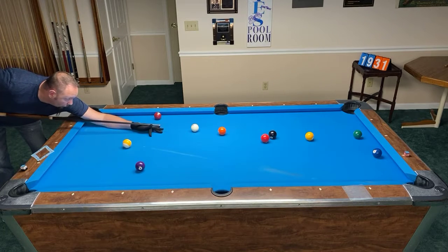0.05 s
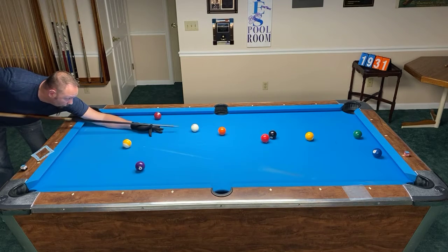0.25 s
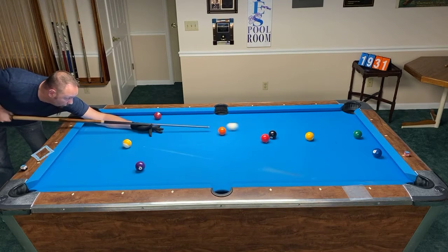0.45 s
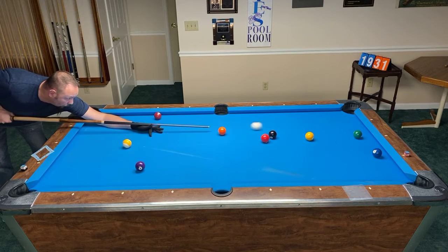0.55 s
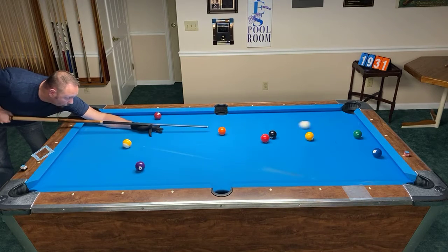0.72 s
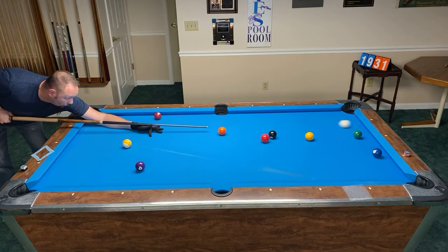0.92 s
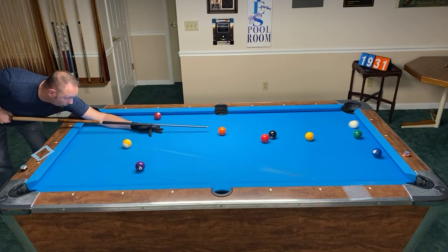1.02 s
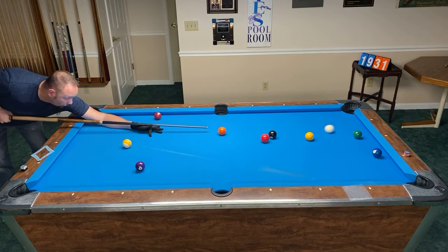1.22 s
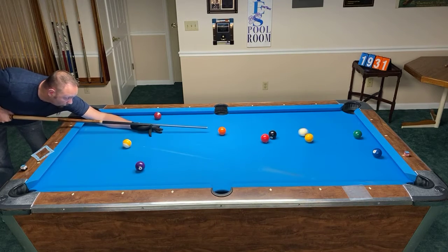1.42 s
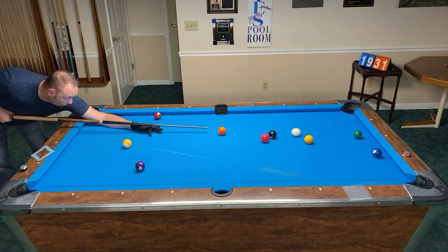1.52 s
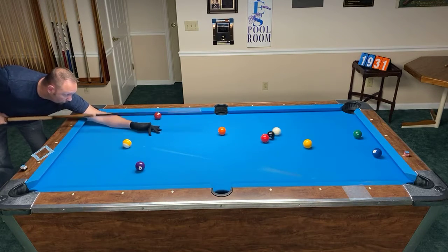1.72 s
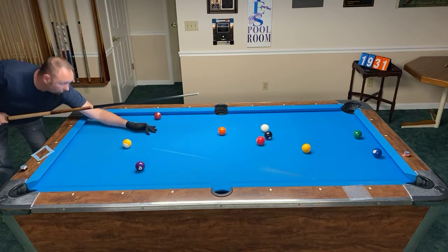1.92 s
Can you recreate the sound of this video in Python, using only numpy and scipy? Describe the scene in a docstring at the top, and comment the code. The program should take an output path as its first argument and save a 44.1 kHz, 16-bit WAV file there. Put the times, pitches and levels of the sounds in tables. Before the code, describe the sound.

Heard from a little distance in a quiet indoor games room, a cue strikes a ball sharply, dull rolling follows, a deep cushion thump, one bright ball click, then a close double click with short reverberation.

```python
"""In a low-ceilinged games room, a pool shot. The cue knocks the white, which hops onto the slate,
rumbles across the cloth, thuds off a cushion, clicks against one ball and then into a close pair.
Blows are short shaped pulses, heard directly, by ceiling and wall echoes and in a decaying noise tail.
Cue and table ring as decaying sines; rolling is a wandering low tone with coloured noise.
Faint clicks and still air lie behind, and a soft hiss swells at the end."""
import sys
import numpy as np
from scipy import signal
from scipy.fft import rfft, irfft
from scipy.io import wavfile

SR = 44100
rng = np.random.default_rng(int(sys.argv[2]) if len(sys.argv) > 2 else 0)


def digitize_waveform(pressure):
    """Quantize a signal to 16-bit integers and store it at the path in sys.argv[1].

    Rows of a 2-D input are taken as channels; values are limited to [-1, 1].
    """
    field = np.atleast_2d(pressure).T
    bounded = np.clip(field, -1, 1)
    quanta = np.round(bounded * 32767).astype(np.int16)
    wavfile.write(sys.argv[1], SR, quanta)


N = 85995  # length in samples
T = np.arange(N) / SR
HZ = np.maximum(np.arange(N + 1) * SR / (2 * N), 1)  # spectrum bins, kept above zero for the log axis

# Colour of the short hard contact of two balls.
# Each row: frequency in Hz before the click's brightness ratio, relative level in dB.
CLICK_COLOUR = [(60, -41), (250, -18), (550, -17), (1000, -5), (1600, -1.5), (2250, 1), (2750, -5.5),
                (3300, -13), (3850, -38), (4300, -28), (5100, -32.5), (5900, -47), (7200, -36.5),
                (10000, -50), (12500, -39.5), (13900, -40.5), (15000, -46), (16000, -51)]
# Ringing of the table's slate and frame. Each row: frequency in Hz, relative level in dB, t60 in seconds.
SLATE_MODES = [(131, -39.5, 0.48), (230, -51, 0.91), (314.5, -36, 0.28), (506.2, -25, 0.33),
               (538, -31.5, 0.24), (566, -32.5, 0.18), (611, -43.5, 0.52), (765, -40, 0.43),
               (845, -41.5, 0.5), (912, -45, 0.34)]


def from_db(db):
    """Decibels to gain."""
    return 10 ** (np.asarray(db) / 20)


def rms_one(x):
    """Scale to unit rms."""
    return x / np.sqrt(np.mean(x ** 2) + 1e-20)


def at_hz(points, hz):
    """Read a table on a log-frequency axis."""
    f, value = np.transpose(points)
    return np.interp(np.log(hz), np.log(f), value)


def level(points):
    """Gain over time from rows of seconds and dB."""
    return from_db(np.interp(T, *np.transpose(points)))


def noise(spectrum):
    """Steady noise coloured by a table of Hz and dB, rms 1."""
    white_noise = rfft(rng.standard_normal(2 * N))
    return rms_one(irfft(white_noise * from_db(at_hz(spectrum, HZ)))[:N])


def drift(rate_hz):
    """Slow chance: noise falling away above the given rate, rms 1."""
    white_noise = rfft(rng.standard_normal(2 * N))
    return rms_one(irfft(white_noise / (1 + (HZ / rate_hz) ** 2) ** 2)[:N])


def pulse(spectrum, ratio=1, peaks_db=0):
    """The most front-loaded causal (minimum-phase) pulse with this spectrum, shifted up by ratio."""
    cepstrum = irfft(np.log(from_db(at_hz(spectrum, HZ / ratio) + peaks_db)))
    # folding the cepstrum onto positive time makes the pulse causal
    cepstrum[1:N] *= 2
    cepstrum[N + 1:] = 0
    return irfft(np.exp(rfft(cepstrum)))[:N // 8]


def place(x, s):
    """Start a sound at time s; a negative s leaves only its later part."""
    start = N - int(round(s * SR))
    return np.pad(x, N)[start:start + N]


def ring(modes, build_s):
    """Decaying sine modes at random phases that swell as they fill the room."""
    swell = 1 - np.exp(-T / build_s)
    total = 0
    for hz, db, t60 in modes:
        decay = from_db(db - 60 * T / t60)
        total = total + decay * np.sin(2 * np.pi * (hz * T + rng.random()))
    return swell * total


def cue():
    """The tip knocks the white; the shaft's resonances colour the knock and ring on."""
    # Knock of the tip. Each row: frequency in Hz, level in dB before the shaft's peaks and the room.
    tip_colour = [(50, 6), (150, 6.5), (400, 16), (700, 8.5), (1050, 7), (1350, -2.5), (1600, 2.5),
                  (2050, -9), (2700, -4), (3400, -3.5), (4000, -9.5), (4550, -13.5), (5100, -25.5),
                  (6600, -22), (9000, -32), (15000, -33)]
    # Ringing of the shaft. Each row: frequency in Hz, level in dB, t60 in seconds.
    shaft_modes = [(1002.6, -34.5, 0.44), (1040, -41.5, 0.47), (1225, -57, .27), (1280, -47, 0.55),
                   (1496, -43.5, 0.5), (1551, -45.5, 0.53), (1795, -41, 0.4), (1821, -44, 0.51),
                   (2217, -53, 0.55), (2570, -41, 0.19), (2610, -41.5, 0.12), (2930, -42.5, 0.31),
                   (3283, -28, 0.14), (3296, -52.5, 0.59), (4081, -63, 0.16)]
    strike_s, direct_db = .2275, -17
    peak_db, half_width_hz = 8, 72
    peaks = np.max([1 / (1 + ((HZ - hz) / half_width_hz) ** 2) for hz, _, _ in shaft_modes], axis=0)
    knock = pulse(tip_colour, peaks_db=peak_db * peaks)
    ringing = place(ring(shaft_modes, build_s=0.017), strike_s)
    return blow(strike_s, knock, direct_db, build_s=0.0061) + ringing


def balls():
    """Each collision of hard balls is one short pulse; the room gives it its length."""
    # Each row: start in seconds, level in dB, share beamed straight at the listener in dB,
    # brightness as a frequency ratio.
    collisions = [(1.3043, 5.5, -2.5, 0.99), (1.6001, 3, -6.5, 1.063), (1.65, 2.5, -5.5, 0.94)]
    total = 0
    for s, db, direct_db, ratio in collisions:
        click = pulse(CLICK_COLOUR, ratio)
        total = total + from_db(db) * blow(s, click, direct_db, build_s=0.0048)
    return total


def table():
    """Soft heavy blows of the white, on the slate and at the cushion, set slate and frame ringing."""
    # Each row: start in seconds, thud level in dB, ring level in dB, brightness of the thud
    # as a frequency ratio.
    thuds = [(.243, -7, 1, 1.73), (.894, -1.5, -10.5, 0.95)]
    # Each row: frequency in Hz before the brightness ratio, relative level in dB.
    thud_colour = [(30, -7.5), (58, 12.5), (100, 18.5), (140, 14), (190, 13.5), (300, 15), (520, 6),
                   (660, -0.5), (900, -6), (1300, -16.5), (2200, -32.5), (5000, -44)]
    direct_db = -29  # relative to each thud's level
    total = 0
    for s, db, ring_db, ratio in thuds:
        thud = blow(s, pulse(thud_colour, ratio), direct_db, build_s=0.021)
        ringing = place(ring(SLATE_MODES, build_s=0.025), s)
        total = total + from_db(db) * thud + from_db(ring_db) * ringing
    return total


def rolling():
    """Rolling balls stir the table's lowest resonance, a dull rumble and, faintly, slate and frame."""
    # Deep boom of the table. Each row: time in seconds, level in dB before the boom's trim.
    boom_level = [(0, -64), (.1, -67), (.2, -57), (.3, -48), (.45, -53.5), (.55, -62), (.68, -55.5),
                  (.76, -43), (.84, -47), (.9, -44), (.97, -43), (1.08, -55), (1.2, -45), (1.28, -59),
                  (1.38, -49), (1.52, -47.5), (1.56, -58), (1.68, -46.5), (1.78, -61.5), (1.95, -57)]
    # Rumble above it. Each row: time in seconds, level in dB before the rumble and ring trims.
    rumble_level = [(0, -61.5), (.22, -65), (.35, -58.5), (.62, -56.5), (.8, -50), (1.15, -66.5),
                    (1.3, -63.5), (1.5, -62.5), (1.95, -65)]
    # Colour of the rumble. Each row: frequency in Hz, relative level in dB.
    rumble_colour = [(50, -9.5), (90, 3), (130, 0), (195, -7), (300, -7.5), (450, -21.5), (900, -35.5),
                     (2000, -57.5), (5000, -64)]
    boom_hz, wander_hz, flutter_db = 65.5, 3.01, 2.5  # wander and flutter are rms
    boom_trim_db, rumble_trim_db, ring_trim_db = -3, -2.5, -8.5

    hz = boom_hz + wander_hz * drift(8)
    tone = np.sin(2 * np.pi * np.cumsum(hz) / SR)
    boom = rms_one(tone * from_db(flutter_db * drift(21)))
    rumble = noise(rumble_colour)
    # the rumble drives the table's modes, wrapping round from end to start
    modes = ring(SLATE_MODES, build_s=0.0061)
    body = rms_one(irfft(rfft(rumble) * rfft(modes), N))
    upper = from_db(rumble_trim_db) * rumble + from_db(ring_trim_db) * body
    return level(boom_level) * from_db(boom_trim_db) * boom + level(rumble_level) * upper


def ticks():
    """Faint clicks, short pulses heard mostly through the room; the first begins before the scene."""
    # Each row: start in seconds, level in dB, brightness as a frequency ratio.
    faint_clicks = [(-.06, -21, 0.98), (0.751, -29.5, 1.17), (.757, -21.5, .42), (0.786, -32, 0.91)]
    direct_db = -12  # relative to each tick's level
    total = 0
    for s, db, ratio in faint_clicks:
        click = pulse(CLICK_COLOUR, ratio)
        total = total + from_db(db) * blow(s, click, direct_db, build_s=0.0023)
    return total


def air():
    """Still air of the room as steady coloured noise, and a soft hiss that swells at the end."""
    # Still air. Each row: frequency in Hz, relative level in dB.
    air_colour = [(20, -15), (42, -22), (60, -4.5), (80, 10), (125, -6), (200, -7.5), (450, -15),
                  (1000, -18.5), (2200, -26), (7300, -28), (9000, -33), (14500, -36.5), (16000, -51)]
    # Swell of the hiss. Each row: time in seconds, level in dB.
    hiss_level = [(1.55, -89), (1.72, -71), (1.85, -70.5), (1.95, -68.5)]
    # Colour of the hiss. Each row: frequency in Hz, relative level in dB.
    hiss_colour = [(100, 0), (1000, 10), (4000, 8), (7500, 3), (10000, 1), (15000, -5)]
    air_db = -63
    return from_db(air_db) * noise(air_colour) + level(hiss_level) * noise(hiss_colour)


def blow(s, contact, direct_db, build_s):
    """One contact heard directly, by its first echoes and through the room's tail."""
    # Ceiling and wall echoes. Each row: delay in seconds, level in dB relative to the direct sound.
    echoes = [(.0156, -2), (.0186, -8), (.0201, -4), (.0287, -11), (.0311, -12.5)]
    paths = room_tail(build_s)
    for delay, db in [(0.001, 0)] + echoes:  # the direct sound comes first
        paths[int(delay * SR)] += from_db(direct_db + db)
    return place(signal.fftconvolve(contact, paths)[:N], s)


def room_tail(build_s):
    """Weak scatter off the table, then diffuse noise dying band by band, each with its due energy."""
    # Reverberation. Each row: frequency in Hz, t60 in seconds.
    room_t60 = [(80, 0.54), (260, 0.56), (700, 0.47), (2000, .43), (4500, 0.4), (12000, 0.14)]
    # What the room's surfaces swallow of the tail. Each row: frequency in Hz, gain in dB.
    treble_loss = [(5000, -0.5), (12000, -5)]
    tail_db, diffuse_start_s, scatter_db = 2.5, .016, -5.5  # scatter is relative to the diffuse part

    white_noise = rfft(rng.standard_normal(2 * N))
    opening = np.where(T < diffuse_start_s, from_db(scatter_db), 1) * (1 - np.exp(-T / build_s))
    edges = np.r_[0, np.geomspace(90, SR / 2, 17)]
    tail = 0
    for low, high in zip(edges, edges[1:]):
        band = irfft(white_noise * ((HZ >= low) & (HZ < high)))[:N]
        decay = from_db(-60 * T / at_hz(room_t60, (low + high) / 2))
        share = np.sqrt(2 * (high - low) / SR / N)  # energy in proportion to bandwidth
        tail = tail + rms_one(band * opening * decay) * share * from_db(at_hz(treble_loss, high))
    return from_db(tail_db) * tail


def scene():
    """The shot over the room's quiet background."""
    return (cue() + balls() + table() + rolling() + ticks() + air())[None]


def record(dry):
    """The deepest bass and the top are cut."""
    bass_cut_hz, top_cut_hz = 46, 15900
    bass_cut = signal.butter(6, bass_cut_hz, "high", fs=SR, output="sos")
    top_cut = signal.ellip(10, .1, 70, top_cut_hz, fs=SR, output="sos")  # .1 dB ripple, 70 dB rejection
    return signal.sosfilt(top_cut, signal.sosfilt(bass_cut, dry))


dry = scene()
out = record(dry)
digitize_waveform(out)
```